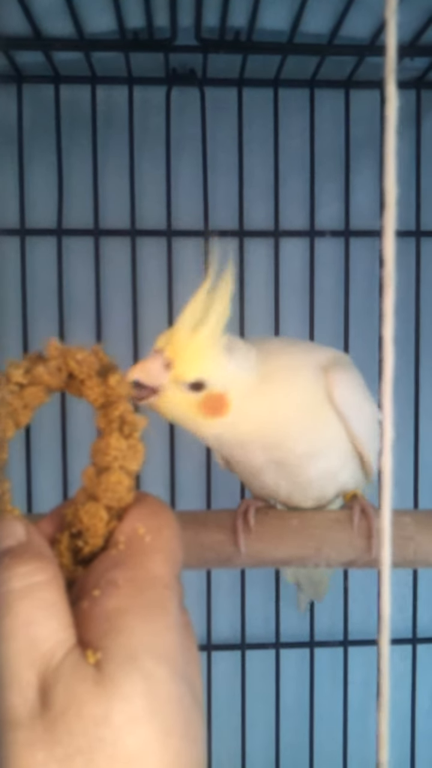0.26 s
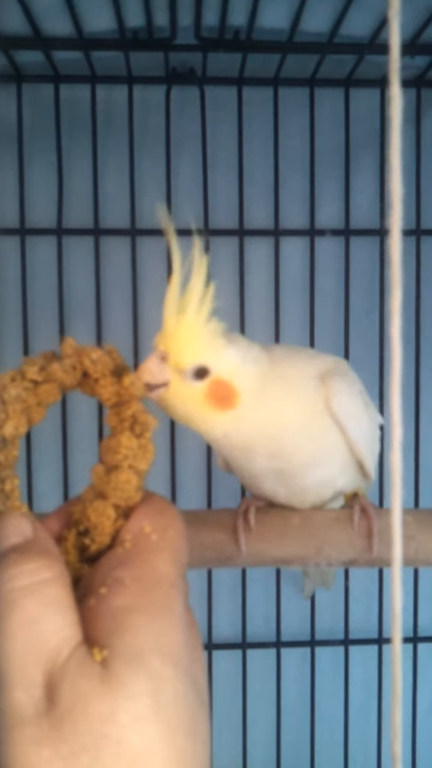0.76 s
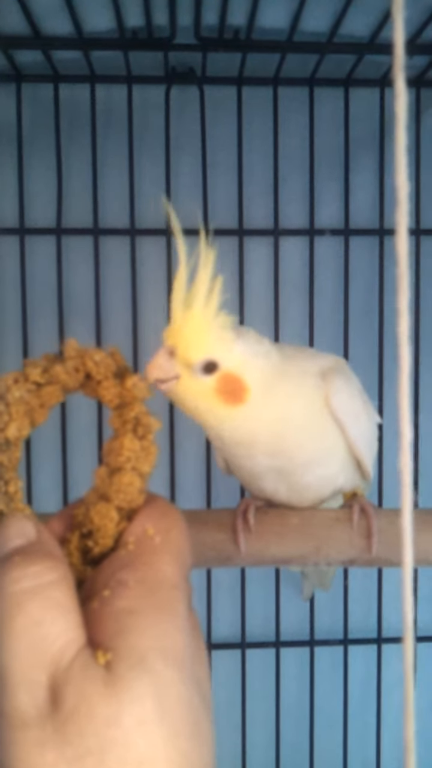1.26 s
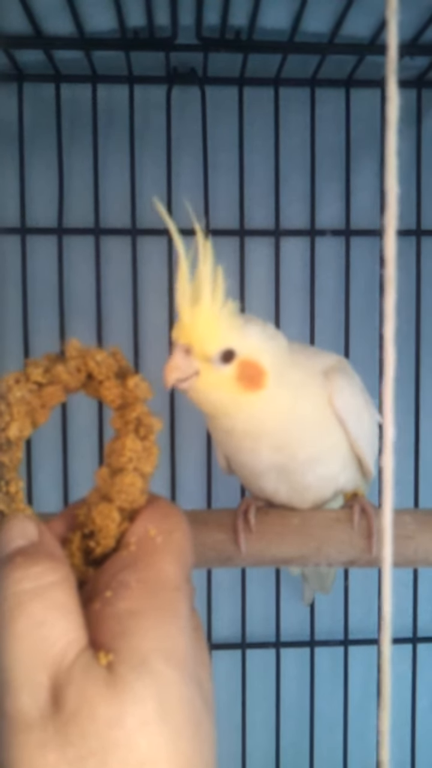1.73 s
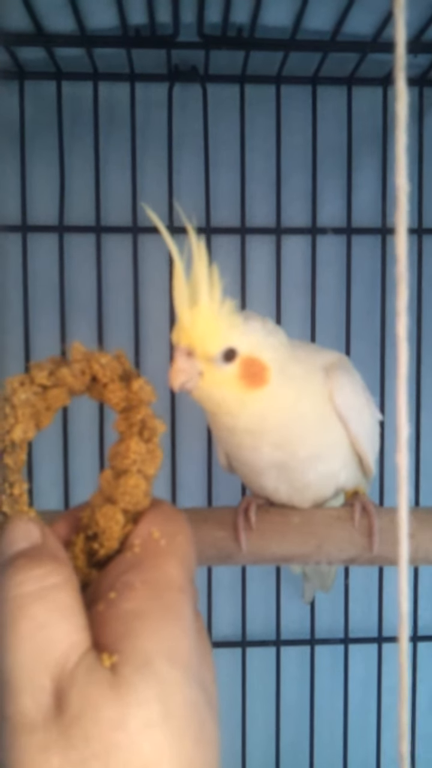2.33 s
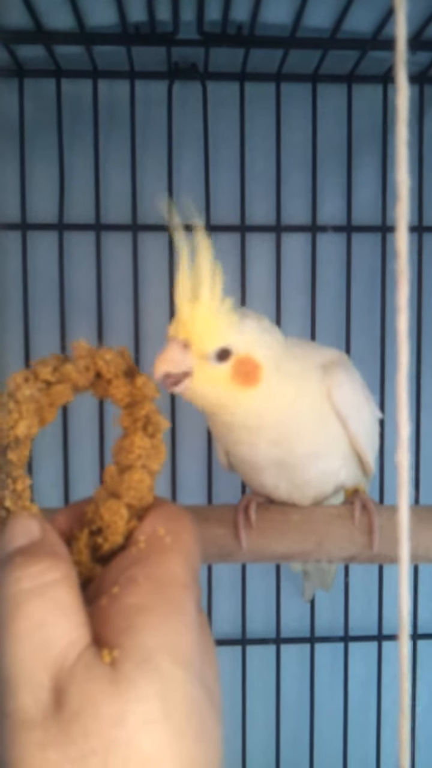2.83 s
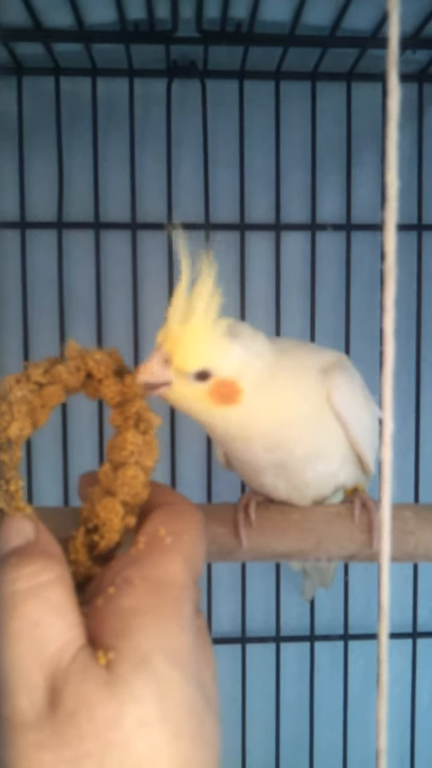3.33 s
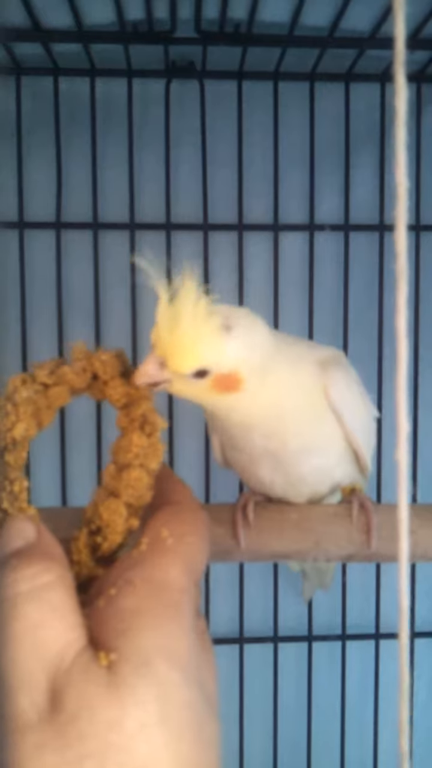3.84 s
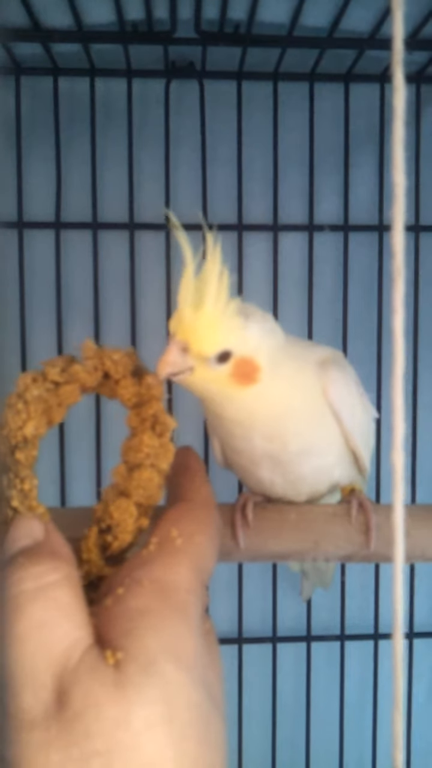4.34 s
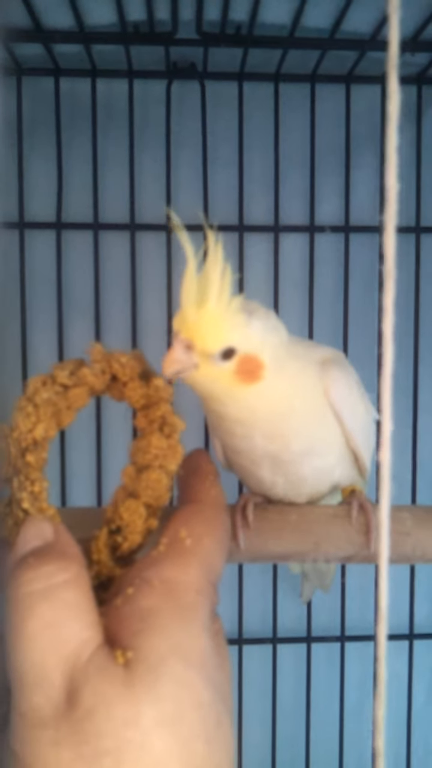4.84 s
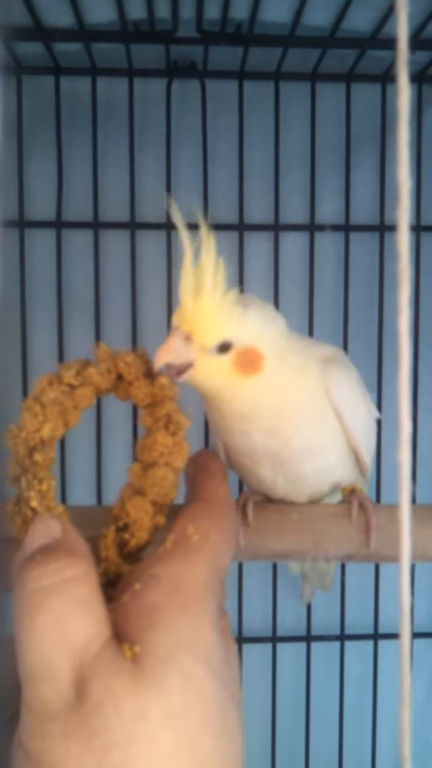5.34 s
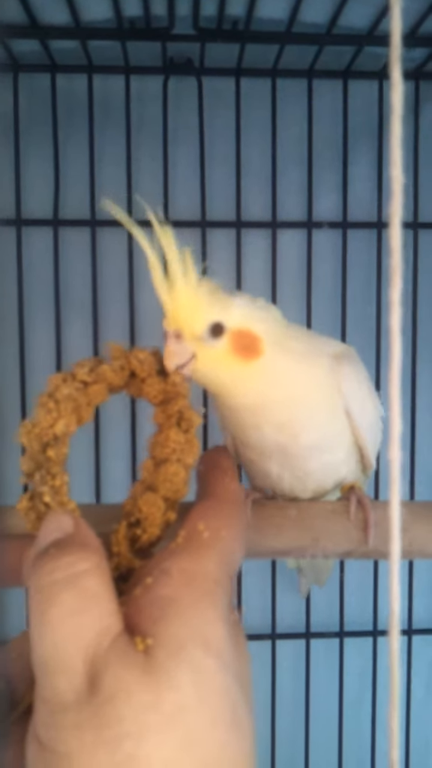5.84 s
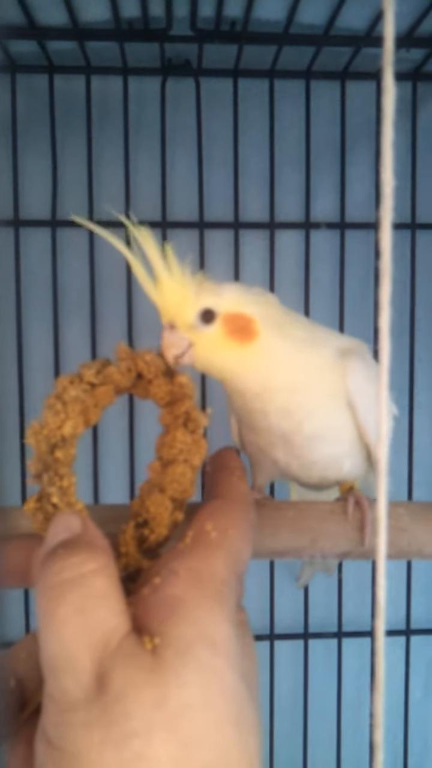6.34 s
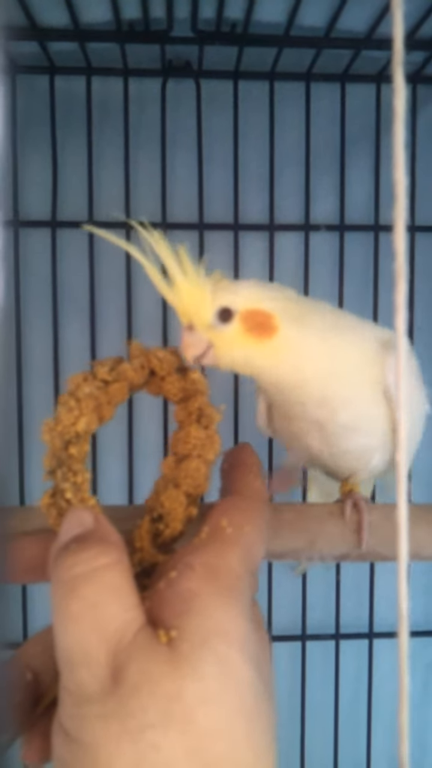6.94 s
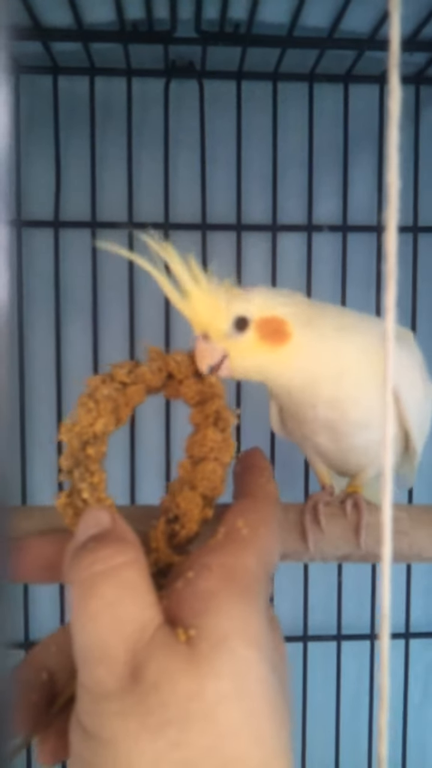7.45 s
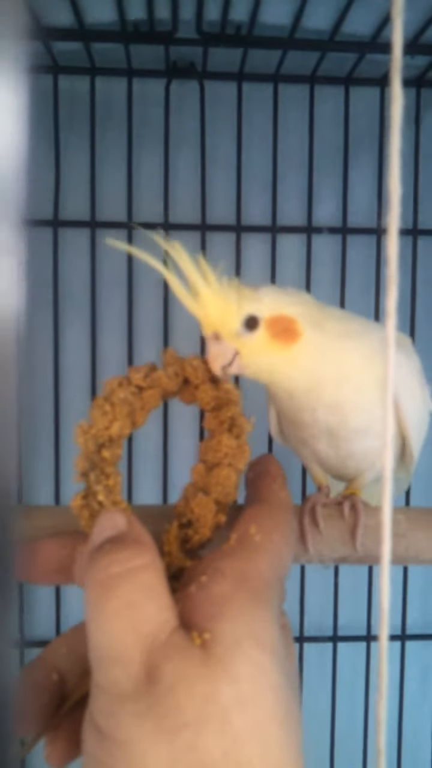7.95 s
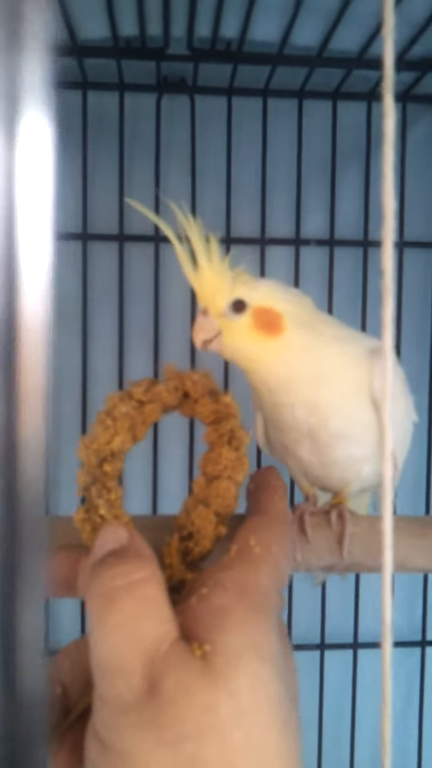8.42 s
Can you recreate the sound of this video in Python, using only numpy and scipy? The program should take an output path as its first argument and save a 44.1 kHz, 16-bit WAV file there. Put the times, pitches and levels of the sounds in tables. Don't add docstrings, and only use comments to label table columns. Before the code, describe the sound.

A small pet bird nibbles seeds off a dry spray with tiny sharp clicks, one loud tick, then a light cage rattle, in a quiet hissy room.

```python
import sys
import numpy as np
from scipy import signal
from scipy.fft import rfft, irfft
from scipy.io import wavfile
from scipy.ndimage import uniform_filter1d, minimum_filter1d

SR = 44100
rng = np.random.default_rng(int(sys.argv[2]) if len(sys.argv) > 2 else 0)


def file_out(sig):
    cols = np.atleast_2d(sig).T
    lim = np.clip(cols, -1, 1)
    pcm = np.round(lim * 32767).astype(np.int16)
    wavfile.write(sys.argv[1], SR, pcm)


def level_to_linear(level):
    exponent = np.asarray(level, float) / 20
    return 10 ** exponent


N = 382788
FLOOR_TOP_HZ = 15380


def shape(x, points):
    hz, db = np.transpose(points)
    f = np.fft.rfftfreq(x.shape[-1], 1 / SR) + 1
    gain_db = np.interp(np.log(f), np.log(hz), db)
    return irfft(rfft(x) * level_to_linear(gain_db), x.shape[-1])


def low_pass(x, hz):
    return signal.sosfilt(signal.ellip(8, 0.2, 60, hz, fs=SR, output="sos"), x)


def ring(hz, width_hz, size):
    t = np.arange(size) / SR
    return np.sin(2 * np.pi * np.outer(hz, t)) * np.exp(-np.pi * np.outer(width_hz, t))


def add(out, sound, s):
    i = int(s * SR)
    out[..., i:i + sound.shape[-1]] += sound[..., :N - i]


def tugging():
    # start in seconds, hold in seconds, level in dB.
    tugs = [(.01, .02, -57.5), (0.32, 0.14, -58), (.635, 0.076, -58.5), (0.88, 0.036, -62),
            (1.043, .08, -63.5), (2.86, .06, -62), (3.075, .02, -63.5), (3.127, 0.024, -53),
            (3.3, .012, -59), (3.36, .006, -65), (3.458, 0.18, -60.5), (3.73, 0.095, -57), (3.95, .08, -62),
            (4.1, .06, -65), (5.457, .05, -59.5), (5.632, .02, -61), (7.38, 0.07, -60), (7.52, .01, -59),
            (7.61, 0.18, -60)]
    rise_db_s, fall_db_s = 450, 170
    t = np.arange(N) / SR
    total = np.zeros(N)
    for s, hold_s, db in tugs:
        early_s = np.maximum(s - t, 0)
        late_s = np.maximum(t - s - hold_s, 0)
        total += level_to_linear(db - rise_db_s * early_s - fall_db_s * late_s)
    return total


def rustle():
    # centre in Hz, width in Hz, level in dB.
    stalk_rings = [(5900, 1600, -27), (8000, 1560, -2), (9750, 2400, 1.5), (13500, 2600, -2)]
    shared_per_s, own_per_s = 900, 2500
    ticks = level_to_linear(1.9 * rng.exponential(1, N)) * (rng.random(N) < shared_per_s / SR) * rng.standard_normal(N)
    own = (rng.random((2, N)) < own_per_s / SR) * rng.standard_normal((2, N))
    hz, width_hz, db = np.transpose(stalk_rings)
    stalk = level_to_linear(db) @ ring(hz, width_hz, 256)
    sound = signal.fftconvolve(ticks + 0.82 * own, stalk[None], axes=1)[:, :N]
    return sound / sound.std() * level_to_linear(2.0) * tugging()


def clicks(events, body, left_late_s, scatter_s, scatter_db, detune, order):
    band_edges_hz = (1050, 2000, 5000, 10000, 15900)
    energy_db = (14.5, 11.4, 10.13, 7.1)
    out, size = np.zeros((3, N)), 768
    hz, width_hz, db = np.transpose(body)
    group = np.digitize(hz, band_edges_hz) - 1
    pairs = list(zip(band_edges_hz, band_edges_hz[1:]))
    bands = [signal.butter(order, pair, "bandpass", fs=SR, output="sos") for pair in pairs]
    soft = [signal.butter(4, pair, "bandpass", fs=SR, output="sos") for pair in pairs]
    t = np.arange(size) / SR
    for s, peak_db, low_db, mid_db, top_db, pan_db in events:
        bend, spread = rng.standard_normal((2, len(hz))), rng.standard_normal((2, size))
        bent_hz = np.minimum(hz * (1 + detune * bend[0]), 16000)
        rings = ring(bent_hz, width_hz, size) * level_to_linear(db + 1.0 * bend[1])[:, None]
        hit = level_to_linear(scatter_db) * spread * np.minimum(t / 0.00024, 1) * np.exp(-t / scatter_s)
        hit[:, 0] = 1
        sound = np.zeros((3, size))
        for k, rel_db in enumerate((low_db, mid_db, 0, top_db)):
            rung = signal.fftconvolve(hit, rings[group == k].sum(0)[None], axes=1)[:, :size]
            part = signal.sosfilt(bands[k], rung)
            norm = np.sqrt((part ** 2).sum(1))[:, None]
            part = part / norm * level_to_linear(peak_db + rel_db + energy_db[k])
            plain = signal.sosfilt(soft[k], t == 0)
            sound += np.vstack([part, plain * part.std() / plain.std()])
        add(out[0], sound[0] * level_to_linear(pan_db / 2), s + max(left_late_s, 0))
        add(out[1], sound[1] * level_to_linear(-pan_db / 2), s - min(left_late_s, 0))
        add(out[2], sound[2], s)
    return out


def tray():
    # start in seconds, peak at 5-10 kHz in dB, plate in dB, left minus right in dB.
    husks = [(0.018, -39, -6, 7), (0.0529, -41, -6, 8), (2.3624, -39.5, -16, 9), (2.84, -28, -12.5, 4),
             (2.916, -42, -7, 4), (3.7104, -28.5, -16, 4), (3.9568, -37.5, -18, 7), (4.0966, -37, -2, 1.5),
             (4.7079, -17, -4.5, 4), (4.799, -33.5, -6, 7), (7.147, -7, -6.5, 7.5), (7.243, -28, -12.5, 8),
             (7.3066, -30, -10, 6), (7.3131, -28, -6, 2), (7.3536, -28, -1.5, 2), (7.3748, -37, 1, 0),
             (7.428, -30.5, -14, 2), (7.4647, -35, -10, 2.5), (7.5128, -31.5, -10, 3),
             (7.5743, -35.5, -7, 1.5), (7.6321, -36.5, -12, -4), (7.7522, -43, -8, 0)]
    # centre in Hz, width in Hz, level in dB.
    tray_rings = [(1940, 1400, -20), (2310, 500, 1), (3140, 920, 10.5), (4220, 310, 7.5), (5870, 480, 0),
                  (6330, 790, 4), (7270, 480, 7), (8400, 580, -5), (9200, 1000, -19), (10470, 1300, -8),
                  (13700, 1800, -12)]
    low_db = -38
    drops = []
    for s, peak_db, plate_db, pan_db in husks:
        fizz_db = -11 - 0.92 * plate_db + 0.16 * peak_db
        drops.append((s, peak_db, low_db, plate_db, fizz_db, pan_db))
    return clicks(drops, tray_rings, left_late_s=-0.0006, scatter_s=0.0018, scatter_db=-14, detune=0.02, order=6)


def beak():
    # start in seconds, peak at 5-10 kHz in dB, shell in dB, fizz in dB.
    nibble_rows = [(0.1118, -36.5, -25, -12), (0.186, -41, -19, 3), (0.3272, -36.5, -16, 7),
                   (0.3894, -39, -19, 1), (0.6513, -39, -13, 2), (0.7127, -39, -12, -0.5),
                   (0.904, -42, -9, 0), (2.6847, -39, -17, -9), (3.004, -41, -11, 1),
                   (3.123, -42, -12, 2.5), (3.147, -42, -1, 11), (3.3098, -38.5, -22, -4),
                   (3.3656, -34.5, -8, 3), (3.5658, -43, -15, 7), (3.8113, -34, -8, 5),
                   (3.9818, -40, -21, 2), (7.701, -40, -3, 7), (2.083, -44, -6, 5), (5.72, -45, -15, 6),
                   (5.991, -36, -18, 7)]
    # start in seconds, peak at 5-10 kHz in dB, beak cavity in dB, shell in dB, fizz in dB.
    split_rows = [(0.9187, -38.5, -0.5, -10, 3), (1.3878, -22.5, -7.5, -1, -8), (1.8234, -43, 3.5, -5, 8),
                  (2.072, -30, 0.5, -0.5, 9), (4.179, -48.5, 4, 6, 2), (4.4621, -14.5, -7.5, -5.5, -1),
                  (4.677, -45.5, 1, 6.5, 6), (4.9831, -34.5, -1.5, -7, 1.5), (5.6647, -31, -3, -3, 2.5),
                  (5.8083, -43, 2, -4, 1), (5.986, -30.5, -9.5, -7.5, 6.5), (6.047, -15.5, -18, -9, 7.5),
                  (6.3435, -30, -12.5, -7, 1.5), (7.8007, -35.5, -2.5, -5, 5.5), (8.0108, -33, -9, -9, 19),
                  (8.0231, -21, -23, -13, 7), (8.0301, -19.5, -17.5, -4.5, 12), (8.2322, -38, -8.5, -3, 5),
                  (1.488, -43, -3, -8, -6)]
    # centre in Hz, width in Hz, level in dB.
    beak_rings = [(1327, 290, -4), (1870, 430, -5), (2920, 800, -4.5), (3500, 1400, -6), (4770, 700, -1.5),
                  (5950, 1200, -5), (7300, 850, 1), (9600, 1000, -4.5), (11800, 2200, -5),
                  (13600, 2600, -1), (15000, 3200, -12)]
    shut_cavity_db, nibble_pan_db = -17, -7.5
    splits = [(*row, -5 + 0.24 * row[-1]) for row in split_rows]
    nibbles = [(s, peak_db, shut_cavity_db, shell_db, fizz_db, nibble_pan_db)
               for s, peak_db, shell_db, fizz_db in nibble_rows]
    return clicks(splits + nibbles, beak_rings, left_late_s=0.00014, scatter_s=0.0015, scatter_db=-16.0,
                  detune=0.019, order=4)


def bump(modes, rise_s, t60_s, peak_db, alike):
    hz, width_hz, db = np.transpose(modes)
    t = np.arange(SR // 2) / SR
    noise = rng.standard_normal((3, len(t)))
    sign = (-1) ** np.arange(len(hz))
    decay = np.exp(-np.log(1000) * np.outer((hz / 2000) ** 0.17, t) / t60_s)
    fade = (1 - np.exp(-t / rise_s)) * decay
    rings = (sign * level_to_linear(db) * np.sqrt(width_hz))[:, None] * ring(hz, width_hz, 8192)
    force = (alike * noise[0] + noise[1:])[:, None] * fade
    sound = signal.fftconvolve(force, rings[None], axes=2).sum(1)
    return sound / np.abs(sound).max() * level_to_linear(peak_db)


def cage():
    FEET, BOOM, LEG, SHELF = (70, 170), (150, 170), (120, 150), (440, 540)
    TOP, EDGE, ALL = (220, 900), (1300, 2200), (70, 2200)
    # start in seconds, peak in dB, rise in seconds, t60 in seconds, part of the stand.
    thuds = [(.455, -43.5, 0.035, 0.41, TOP), (.48, -52, .04, 0.42, EDGE), (.52, -51, 0.052, 0.33, FEET),
             (7.01, -42.5, 0.013, 0.21, LEG), (7.015, -46.5, 0.01, 0.23, SHELF),
             (7.07, -47, .005, .08, SHELF), (7.25, -45, 0.031, 0.15, LEG), (8.085, -45, 0.015, 0.2, TOP),
             (8.085, -49.5, 0.017, 0.25, EDGE), (8.4, -31, 0.008, 0.43, ALL),
             (8.41, -34.5, 0.019, 0.59, ALL), (8.398, -45, 0.0071, 0.49, EDGE),
             (8.4, -37, .003, 0.21, BOOM)]
    # start in seconds, peak in dB, rise in seconds, rattle t60 in seconds.
    door_bumps = [
        (6.997, -43, .004, 0.07),
        (7.004, -42, .002, .05),
        (7.018, -31.5, .0004, 0.13),
        (7.049, -38.5, .001, 0.068),
        (7.049, -45, .004, 0.5),
    ]
    # start in seconds, peak in dB, rise in seconds, rattle t60 in seconds.
    bar_bumps = [
        (8.3953, -20, 0.00022, .07),
        (8.397, -21, 0.0054, 0.32),
    ]
    # centre in Hz, width in Hz, level in dB.
    stand_modes = [(119, 21, -6.5), (135, 13, -17), (164, 15.4, -0.5), (197, 34, -12.5), (227, 18, -9.5),
                   (313, 71, -4), (400, 34, -3.5), (460, 54, -5), (530, 32, -5.5), (682, 64, -5.5),
                   (862, 96, -6), (1170, 390, -3.5), (1440, 240, -7), (1940, 430, -10.5)]
    # centre in Hz, width in Hz, level in dB.
    door_modes = [(2700, 470, -2.5), (3700, 190, -2.5), (4900, 560, -1.5), (5870, 90, 0), (6150, 130, 0),
                  (7040, 310, -3), (8120, 450, 1.5)]
    # centre in Hz, width in Hz, level in dB.
    bar_modes = [(2170, 140, -4), (2350, 250, -5.5), (2900, 310, -5), (3150, 280, -7), (4070, 350, -5),
                 (4540, 300, -5), (5250, 600, -0.5), (6030, 660, 1), (6930, 320, 4), (7520, 400, 4),
                 (8780, 520, 6), (11150, 580, 6), (12500, 800, 1), (14400, 990, 0)]
    # centre in Hz, width in Hz, level in dB.
    rod_modes = [(6030, 120, 4), (8910, 60, 1), (10800, 45, -1)]
    out = np.zeros((2, N))
    for s, peak_db, rise_s, t60_s in door_bumps:
        add(out, bump(door_modes, rise_s, t60_s, peak_db, alike=0.57) * level_to_linear([[1.5], [-1.5]]), s)
    for s, peak_db, rise_s, t60_s in bar_bumps:
        add(out, bump(bar_modes, rise_s, t60_s, peak_db, alike=0.33) * level_to_linear([[-1.5], [1.5]]), s)
    add(out, bump(rod_modes, rise_s=0.003, t60_s=0.52, peak_db=-31, alike=0.34), 8.397)
    for s, peak_db, rise_s, t60_s, (low_hz, high_hz) in thuds:
        modes = [mode for mode in stand_modes if low_hz < mode[0] < high_hz]
        add(out, bump(modes, rise_s, t60_s, peak_db, alike=2.35), s)
    return out


def note(start_s, end_s, from_hz, to_hz, db, rough):
    t = np.arange(N) / SR
    times_s = [start_s, (start_s + end_s) / 2, end_s]
    level_db = np.interp(t, times_s, [db - 7, db, db - 5], -120, -120)
    pitch_hz = np.interp(t, times_s, [from_hz, (from_hz + to_hz) / 2, to_hz], 0, 0)
    waver = 1 + rough * uniform_filter1d(rng.standard_normal(N), size=200)
    return np.sqrt(2) * level_to_linear(level_db) * waver * np.sin(2 * np.pi * np.cumsum(pitch_hz) / SR)


def engine():
    return note(0.72, 1.45, from_hz=87, to_hz=60, db=-64, rough=4.7)


def chirp():
    # start in seconds, end in seconds, from in Hz, to in Hz, level in dB.
    chirp_notes = [
        (2.46, 2.664, 1970, 1940, -64.5),
        (2.505, 2.574, 1900, 1790, -59.5),
        (2.565, 2.6, 2450, 2520, -62),
        (2.6, 2.658, 1490, 1460, -66),
        (2.635, 2.665, 2960, 3000, -63),
    ]
    return sum(note(*row, rough=5) for row in chirp_notes)


def room(dry):
    # band centre in Hz, level in dB, t60 in seconds.
    room_bands = [(1070, -24, 0.39), (2640, -24, 0.38), (5700, -22, 0.37), (11900, -29, 0.24)]
    t = np.arange(SR // 2) / SR
    tail = 0
    for hz, db, t60_s in room_bands:
        outline = [(hz / 3, -30), (hz / 1.49, 0), (hz * 1.26, 0), (hz * 3, -30)]
        band = shape(rng.standard_normal((2, len(t))), outline)
        tail = tail + level_to_linear(db) * band * np.exp(-np.log(1000) * t / t60_s) * np.minimum(t / 0.0012, 1)
    return signal.fftconvolve(dry[None], tail * 0.19, axes=1)[:, :N]


def scene():
    near = beak() + tray()
    spray = rustle()
    soft = spray + room(near[2] + spray[0]) + cage() + chirp() + engine()
    return near[:2] + low_pass(soft, FLOOR_TOP_HZ)


def top_cut(x):
    return signal.sosfilt(signal.butter(12, 17160, fs=SR, output="sos"), x)


def record(dry):
    # frequency in Hz, difference in dB.
    port_difference = [(300, 5.5), (1500, 4), (4000, -1.5), (6200, 5), (8000, -5), (11000, 0), (15000, 4)]
    # frequency in Hz, density in dB per Hz.
    hiss_colour = [(12, -35), (20, -7), (107, -3), (330, -8), (700, -11.5), (1440, -15), (2800, -17.5),
                   (8000, -19), (15000, -21.5)]
    left = shape(dry[0], np.multiply(port_difference, (1, 0.5)))
    right = shape(dry[1], np.multiply(port_difference, (1, -0.5)))
    dry = np.array([left, right])
    hiss = low_pass(shape(rng.standard_normal((2, N)), hiss_colour), FLOOR_TOP_HZ)
    hold = int(0.054 * SR)
    held = -minimum_filter1d(-np.abs(dry), hold, axis=1, origin=(hold - 1) // 2)
    drain_hz = 3.8
    drain = np.exp(-2 * np.pi * drain_hz / SR)
    bias = signal.lfilter([1, -1], [1, -drain], 0.027 * np.maximum(held - 0.2, 0))
    mix = low_pass(dry + bias, 16400) + hiss / hiss.std() * level_to_linear(-53)
    return top_cut(mix)


dry = scene()
out = record(dry)
file_out(out)
```